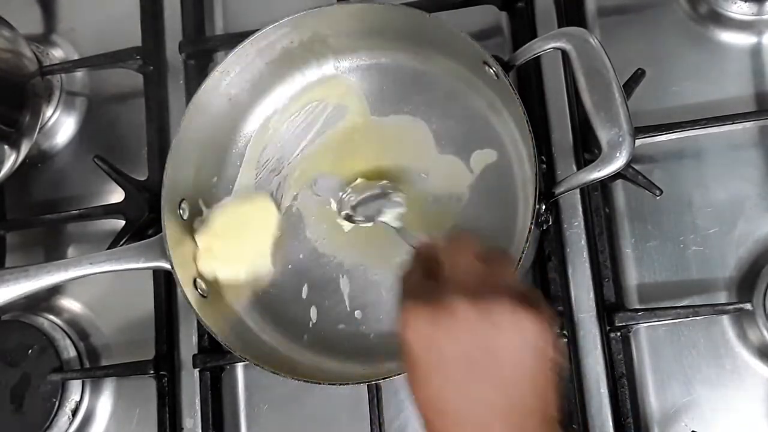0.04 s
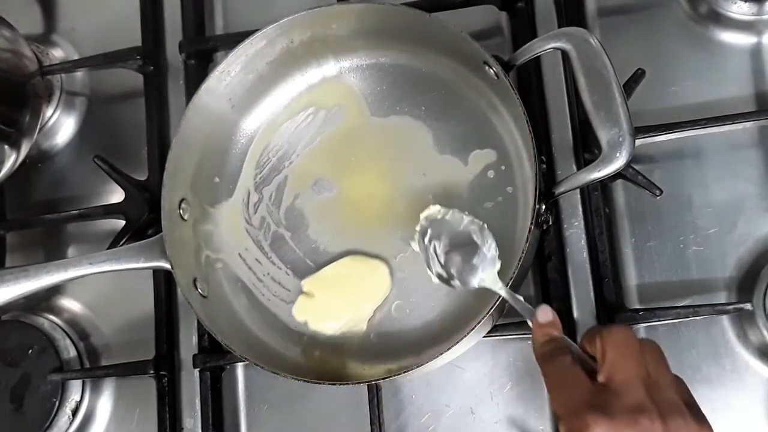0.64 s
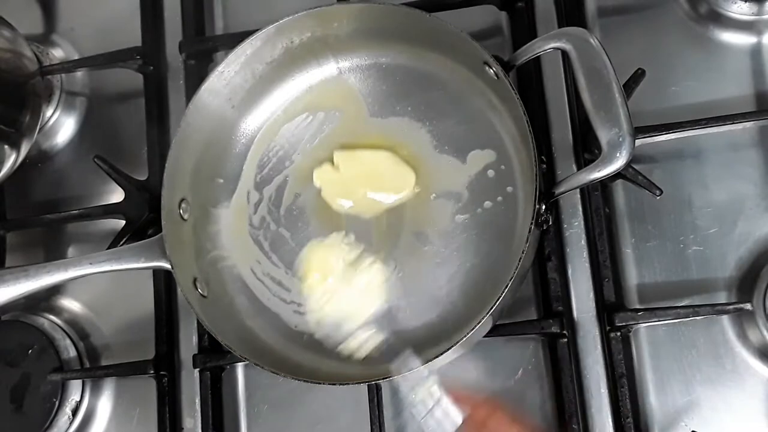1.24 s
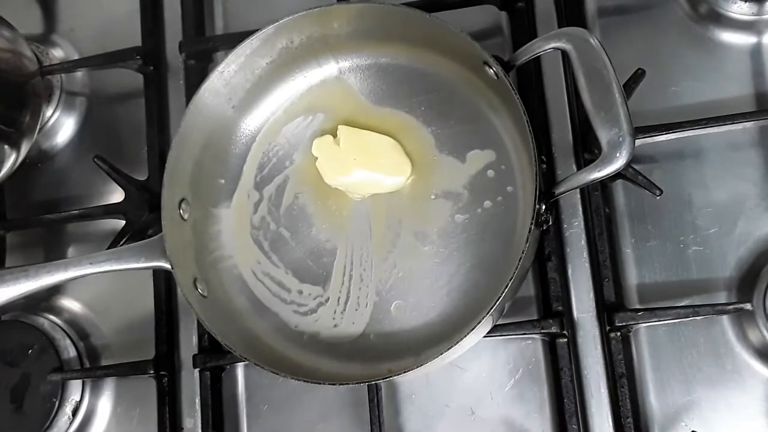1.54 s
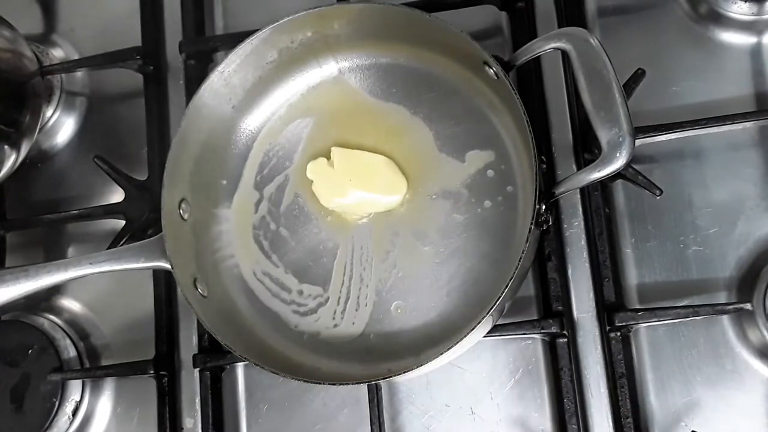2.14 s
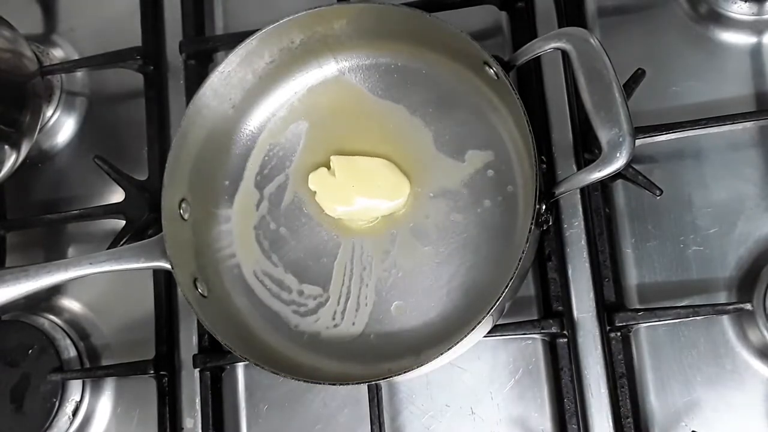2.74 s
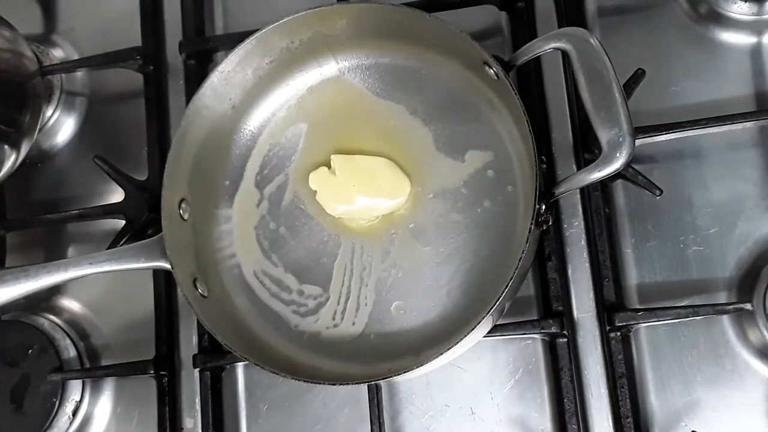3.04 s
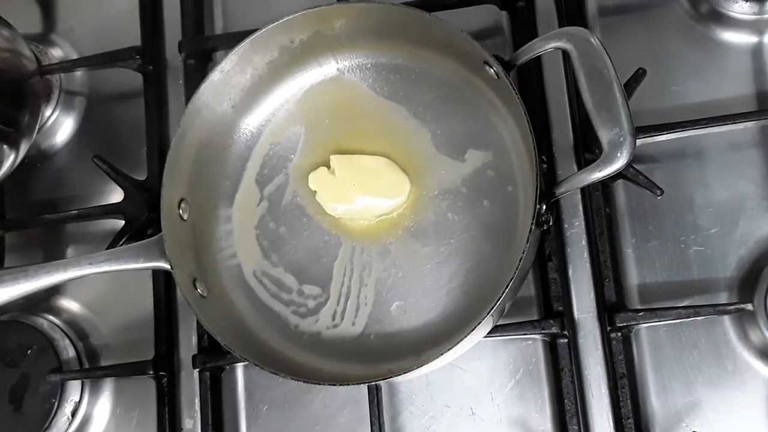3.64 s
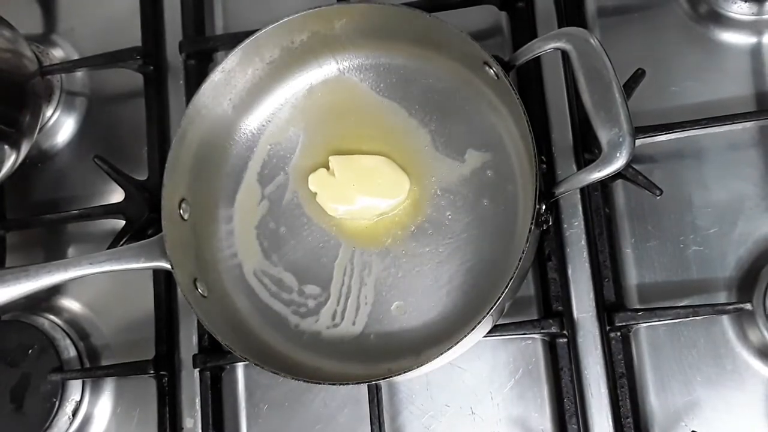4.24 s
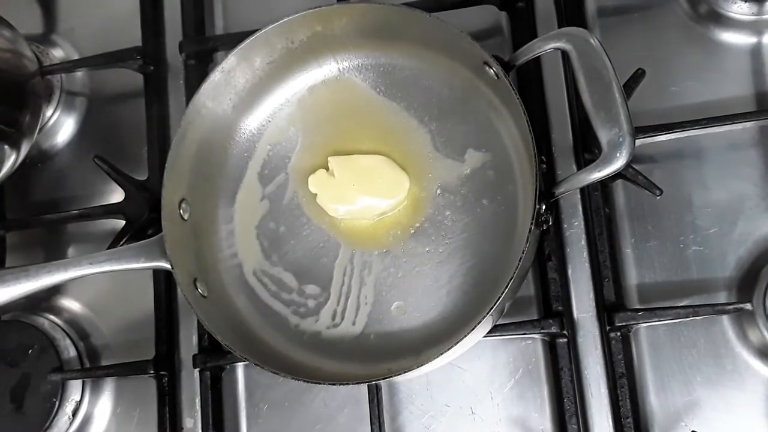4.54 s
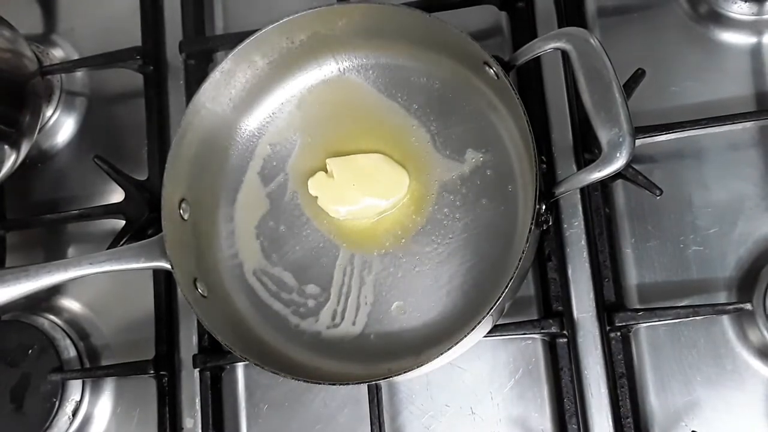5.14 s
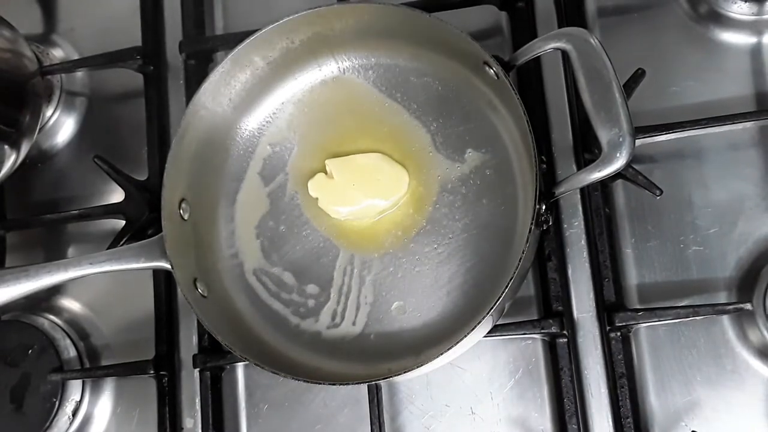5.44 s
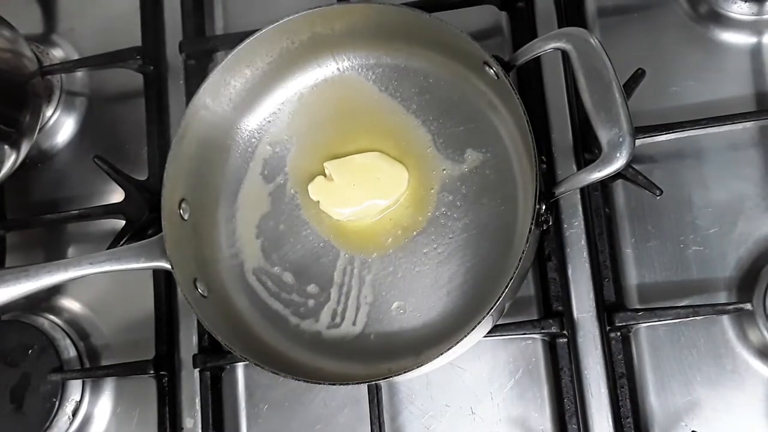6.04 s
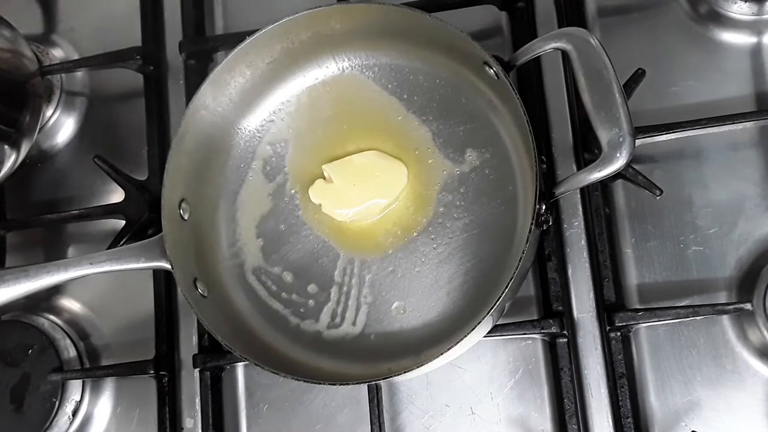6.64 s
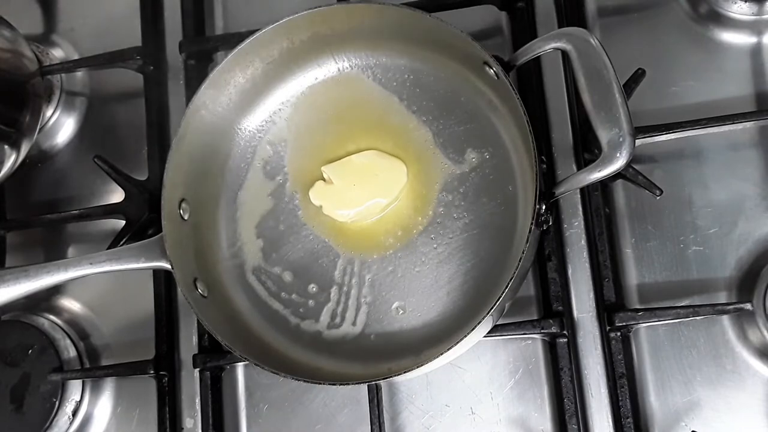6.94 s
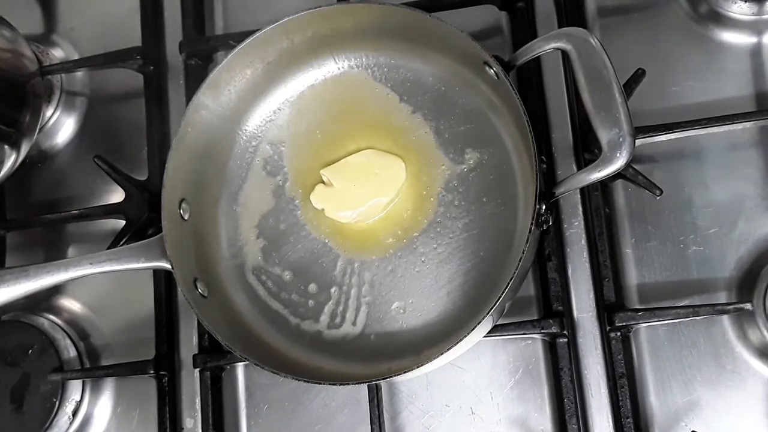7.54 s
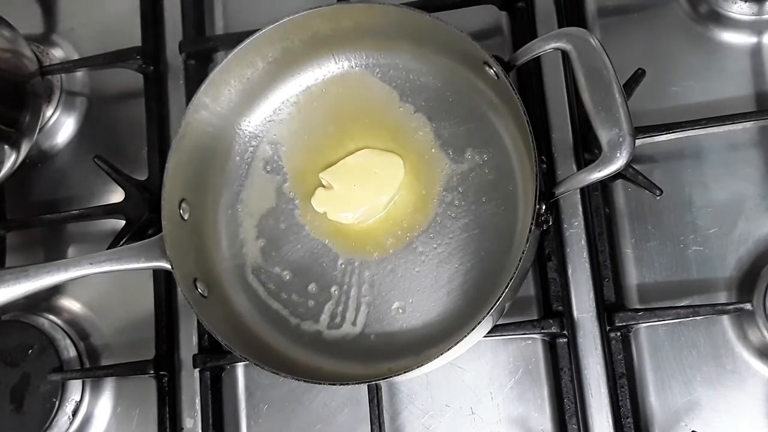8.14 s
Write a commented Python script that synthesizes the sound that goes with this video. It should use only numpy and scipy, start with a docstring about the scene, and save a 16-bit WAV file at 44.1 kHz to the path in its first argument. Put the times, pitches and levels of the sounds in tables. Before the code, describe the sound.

A spoon pushes butter around a metal frying pan, then the butter keeps sizzling, with occasional spits and light knocks.

```python
"""A bright, steady sizzle: a knob of butter in a hot steel frying pan, heard from just above the stove.
Its water bursts out in thousands of tiny steam pops that ring the pan and blur in the kitchen.
A spoon first pushes the butter around; fat spits, the pan knocks, and two pairs of squeaks sound.
Faint bumps, rustles, a rumble and a mains hum lie underneath."""
import sys
import numpy as np
from scipy import signal
from scipy.fft import rfft, irfft, next_fast_len
from scipy.io import wavfile
from scipy.ndimage import uniform_filter1d

SR = 44100
rng = np.random.default_rng(int(sys.argv[2]) if len(sys.argv) > 2 else 0)


def inscribe(sig):
    """Save sig as 16-bit PCM at rate SR to the path in sys.argv[1].

    A 1-D sig is mono; a 2-D sig holds one channel per row.
    Samples are clipped to [-1, 1] before scaling.
    """
    pcm = np.round(np.clip(np.atleast_2d(sig).T, -1, 1) * 32767)
    wavfile.write(sys.argv[1], SR, pcm.astype(np.int16))


N = 365677
TIME = np.arange(N) / SR

# how hard the butter boils: (time [s], level [dB])
BOIL = [(0, -17), (.14, -23), (.57, -24), (.6, -21), (.85, -19), (1.13, -19.5), (1.43, -17), (1.8, -17),
        (2.55, -17), (3.03, -19.5), (3.38, -18.5), (3.7, -16.5), (5, -16.5), (5.6, -16), (6.4, -18.5),
        (6.58, -16.3), (6.75, -17.5), (7.28, -17), (7.65, -16.5), (8.29, -16)]
# spoon pushes smearing the butter: (start [s], length [s], crackle [dB], pan ring [dB])
STROKES = [(0, .025, -32, -37), (.1, 0.053, -47, -46), (.7, 0.027, -34.5, -57), (.875, 0.014, -33.5, -44),
           (.97, 0.12, -35, -38), (1.2, 0.056, -41, -43.5), (1.31, 0.048, -34, -40), (1.41, .02, -39, -43),
           (1.49, 0.041, -34.5, -42)]
STROKE_ATTACK_S, STROKE_RELEASE_S = 0.024, 0.052


def undb(db):
    """Decibels to gain."""
    return 10 ** (np.asarray(db) / 20)


def unit(x):
    """Scale to rms 1."""
    return x / np.sqrt(np.mean(x ** 2))


def follow(rows):
    """Gain along a (time [s], level [dB]) curve; fades outside its span."""
    times_s, db = np.transpose(rows)
    outside_s = np.maximum(times_s[0] - TIME, 0) + np.maximum(TIME - times_s[-1], 0)
    return undb(np.interp(TIME, times_s, db)) * np.exp(-10 * outside_s)


def swell(start_s, length_s, attack_s, release_s):
    """Envelope: rises to 1 at its start, holds, dies away."""
    before_s, after_s = np.maximum(start_s - TIME, 0), np.maximum(TIME - start_s - length_s, 0)
    return np.exp(-before_s / attack_s - after_s / release_s)


def swells(rows, attack_s, release_s, column=2):
    """Power sum of (start [s], length [s], levels [dB]...) envelopes; column picks the level."""
    gains = (undb(row[column]) * swell(row[0], row[1], attack_s, release_s) for row in rows)
    return np.sqrt(sum(gain ** 2 for gain in gains))


def walk(rate_hz):
    """Smooth random wander; rms 1."""
    held = rng.standard_normal(N)[(TIME * rate_hz).astype(int)]
    return unit(uniform_filter1d(held, max(int(SR / rate_hz), 1)))


def pops(per_s, spread_db):
    """Impulses of random time and size; rms 1."""
    at = np.flatnonzero(rng.random(N) < per_s / SR)
    size, sign = np.minimum(rng.standard_normal(N)[at], 2), (-1) ** at
    return unit(np.bincount(at, sign * undb(spread_db * size), N))


def blows(rows):
    """One impulse per (time [s], level [dB]) row."""
    times_s, db = np.transpose(rows)
    return np.bincount((times_s * SR).astype(int), undb(db), N)[:N]


def through(x, response):
    """Convolve with an impulse response."""
    return signal.fftconvolve(x, response)[:len(x)]


def colour(points, size=4096):
    """Minimum-phase click with a (frequency [Hz], level [dB]) spectrum; peak 1."""
    hz, db = np.transpose(points)
    log_hz = np.log(np.fft.rfftfreq(size, 1 / SR) + 1)
    log_gain = np.interp(log_hz, np.log(hz), np.log(undb(db)))
    cepstrum = irfft(log_gain)[:size // 2]
    cepstrum[1:] *= 2
    click = irfft(np.exp(rfft(cepstrum, size)))
    return click / np.abs(click).max()


def resonate(x, hz, width_hz):
    """One damped resonance, gain 1 at its centre."""
    return signal.lfilter(*signal.iirpeak(hz, hz / width_hz, fs=SR), x + np.finfo(float).eps)


def room(x, t60_s, wet_db):
    """Hard kitchen walls add a diffuse tail."""
    t = TIME[:SR // 2]
    tail = rng.standard_normal(len(t)) * undb(-60 * t / t60_s) * (t > .004)
    return x + undb(wet_db) * through(x, tail / np.linalg.norm(tail))


def scatter(hits, t60_s, wet_db):
    """Each impulse comes from its own spot, so gets its own diffuse tail from the walls."""
    decay = np.exp(-2 * np.log(1000) / (t60_s * SR))
    energy = signal.lfilter([1 - decay], [1, -decay], hits ** 2 + np.finfo(float).eps ** 2)
    return hits + undb(wet_db) * np.sqrt(energy) * rng.standard_normal(N)


def hob_echo(x, lag_s, gain, cutoff_hz):
    """Nearby steel throws back a duller copy, which combs the hiss."""
    hz = np.fft.rfftfreq(next_fast_len(N + SR // 10), 1 / SR)
    echo = gain / (1 + (hz / cutoff_hz) ** 4) * np.exp(-2j * np.pi * hz * lag_s)
    size = 2 * (len(hz) - 1)
    return irfft(rfft(x, size) * (1 + echo), size)[:N]


def pan(x, cutoff_hz):
    """Pan modes driven through soft butter, which dulls each contact."""
    # steel pan modes: (frequency [Hz], width [Hz], level [dB])
    modes = [(740, 16, -8.5), (766, 27, -0.5), (1017, 140, -7), (1202, 39, 1.5), (1210, 110, -31),
             (1750, 98, -5)]
    push = signal.sosfilt(signal.butter(2, cutoff_hz, fs=SR, output="sos"), x + np.finfo(float).eps)
    # narrow modes hold their energy longer
    return sum(undb(db) * np.sqrt(SR / width_hz) * resonate(push, hz, width_hz)
               for hz, width_hz, db in modes)


def ringing(resonances, per_s, spread_db, wet_db):
    """Each resonance is pinged by its own stream of pops; rms 1."""
    out = 0
    for hz, width_hz, db in resonances:
        stream = scatter(pops(per_s, spread_db), t60_s=0.074, wet_db=wet_db)
        out = out + undb(db) * unit(resonate(stream, hz, width_hz))
    return unit(out)


def chirps(rows, t60_s, rise, size=2048):
    """Bubbles (time [s], level [dB], pitch [Hz]) ring briefly and glide up as they surface."""
    t, out = TIME[:size], np.zeros(N + size)
    envelope = undb(-60 * t / t60_s) * (1 - np.exp(-t / .0004))
    for start_s, db, hz in rows:
        start = int(np.clip(start_s * SR, 0, N - 1))
        phase = 2 * np.pi * hz * t * (1 + rise * t / t60_s)
        out[start:start + size] += undb(db) * envelope * np.sin(phase)
    return out[:N]


def background(hum_hz=100.3, hum_db=-56.5):
    """Low kitchen rumble and a wavering mains hum, both fainter at first."""
    # kitchen rumble spectrum: (frequency [Hz], level [dB])
    spectrum = [(20, -40), (48, -19), (75, 0), (135, 2.5), (185, 1), (220, -11), (290, -1), (450, -2.5),
                (800, -14), (3000, -17.5)]
    rumble = unit(through(rng.standard_normal(N), colour(spectrum)))
    rumble *= undb(-52.5 + 1.3 * walk(rate_hz=3.7))
    hum = np.sqrt(2) * np.sin(2 * np.pi * hum_hz * TIME) * undb(hum_db + 1.5 * walk(rate_hz=5))
    return (rumble + hum) * undb(np.interp(TIME, [.5, .7], [-5, 0]))


def rustles(attack_s=0.067, release_s=0.052):
    """Soft friction: dull rubs close by, lighter brushes against the stove."""
    # friction spectra: (frequency [Hz], level [dB])
    rub_spectrum = [(30, -28), (70, 1), (120, -1.5), (200, -8.5), (290, -2), (550, -16.5), (1700, -10.5),
                    (4000, -40)]
    brush_spectrum = [(150, -20), (330, -1), (550, 1), (900, -15), (2000, -10), (4000, -36)]
    # contacts: (start [s], length [s], level [dB])
    rubs = [(3.7, 0.077, -44), (3.86, 0.2, -43.5), (7.0, .01, -47)]
    brushes = [(5.73, 0.032, -48.5), (5.85, .02, -51)]
    rub = unit(through(pops(per_s=410, spread_db=-1.5), colour(rub_spectrum)))
    brush = unit(through(pops(per_s=1100, spread_db=3), colour(brush_spectrum)))
    return rub * swells(rubs, attack_s, release_s) + brush * swells(brushes, attack_s, release_s)


def bumps():
    """Dull bumps on the stove."""
    # impacts: (time [s], level [dB])
    hits = [(.606, -29.5), (.835, -38), (1.297, -44), (5.838, -42)]
    # thud spectrum: (frequency [Hz], level [dB])
    thud = [(45, -41), (100, -15), (150, 0), (190, 9.5), (240, -18), (370, -1), (550, -17), (1500, -31.5)]
    return through(scatter(blows(hits), t60_s=0.26, wet_db=7), colour(thud)) * undb(0.5)


def knocks():
    """The spoon, or steam escaping under the butter, rings the pan in short flurries of contacts."""
    # blows on the pan: (time [s], level [dB])
    hits = [(0.596, -18), (1.31, -24), (1.556, -22), (2.028, -21.5), (2.807, -27), (3.175, -25),
            (4.337, -27.5), (6.67, -31.5), (6.74, -26.5), (7.837, -30)]
    return pan(scatter(blows(hits), t60_s=0.2, wet_db=-3.5), cutoff_hz=990) * undb(5.5)


def spits():
    """Fat spits: a spray plus one bubble's ring."""
    # spits: (time [s], level [dB], bubble pitch [Hz])
    bursts = [(0.4952, -25, 3220), (0.884, -23, 3190), (1.41, -20, 3190), (1.6637, -25.5, 3270),
              (1.812, -19, 4250), (1.8205, -17, 4800), (1.838, -21, 4250), (1.9066, -18, 4900),
              (2.0867, -18, 4770), (2.096, -20, 4300), (3.4655, -22, 4800), (3.915, -22, 3970),
              (5.127, -21, 4900), (7.487, -22, 5000), (7.898, -18, 4940)]
    # spray spectrum: (frequency [Hz], level [dB])
    spectrum = [(1200, -44), (2800, 1), (4200, 14), (5500, -5), (8000, -8), (15000, -23)]
    hits = blows(np.array(bursts)[:, :2])
    spray = through(scatter(hits, t60_s=.19, wet_db=6.5), colour(spectrum))
    bubbles = room(chirps(bursts, t60_s=0.05, rise=0.016), t60_s=.2, wet_db=-7)
    return (spray + bubbles) * undb(-3)


def squeaks():
    """Thin, wavering whistles: sliding butter, later probably steam squeezing out under it."""
    # whistles: (start [s], length [s], level [dB], pitch [Hz], glide [Hz/s])
    whistles = [(0.286, 0.022, -49, 2540, -900), (0.392, 0.038, -49, 2460, -900),
                (3.53, 0.12, -36.5, 3045, 300), (3.67, .05, -43.5, 3005, 300)]
    out = 0
    for start_s, length_s, db, hz, hz_per_s in whistles:
        pitch_hz = hz + hz_per_s * np.clip(TIME - start_s, 0, length_s) + 48 * walk(rate_hz=130)
        tone = np.sqrt(2) * np.sin(2 * np.pi * np.cumsum(pitch_hz) / SR)
        tone *= undb(2.5 * walk(rate_hz=70) - 1)
        out = out + tone * undb(db) * swell(start_s, length_s, attack_s=.007, release_s=.005)
    return room(out, t60_s=0.71, wet_db=-4.5)


def sliding(column):
    """Gain from the butter's motion: spoon pushes on top of a slowing glide."""
    # butter gliding on its melt, then settling: (start [s], length [s], crackle [dB], pan ring [dB])
    glides = [(.85, .45, -42.5, -44.5), (1.95, 0.36, -39, -47.5)]
    pushes = swells(STROKES, STROKE_ATTACK_S, STROKE_RELEASE_S, column)
    return np.hypot(swells(glides, attack_s=0.37, release_s=1, column=column), pushes)


def stirring():
    """Fresh butter crackles where smeared; the sliding spoon makes the pan ring and sing."""
    # smeared butter spectrum: (frequency [Hz], level [dB])
    smear = [(500, -19), (1400, -13.5), (2000, -3.5), (2600, -0.5), (3300, -1), (4200, -2), (5200, -7),
             (9000, -31)]
    # resonances of the greasy steel: (frequency [Hz], width [Hz], level [dB])
    sing_modes = [(2520, 150, -10), (3193, 180, 5), (3390, 55, -4), (4070, 200, -2), (4570, 140, -4.5)]
    # singing under the spoon: (time [s], level [dB])
    sing_levels = [(0, -44), (.36, -40.5), (.54, -35.5), (.85, -43), (1.2, -38), (1.85, -43), (2.1, -41)]
    crackle = scatter(pops(per_s=1500, spread_db=5.5), t60_s=0.21, wet_db=-3)
    crackle = hob_echo(through(crackle, colour(smear)), lag_s=0.00117, gain=0.15, cutoff_hz=6500)
    crackle = unit(crackle) * sliding(column=2)
    scrape = unit(pan(pops(per_s=1500, spread_db=0), cutoff_hz=2410)) * sliding(column=3)
    sing = ringing(sing_modes, per_s=1600, spread_db=2.5, wet_db=-13) * follow(sing_levels)
    return room(crackle + scrape + sing, t60_s=0.1, wet_db=-10)


def froth(surge, melt_s=1.18, growth_db_per_s=0.19):
    """Larger bubbles: they come in as the butter melts and spreads, and when the spoon squeezes it."""
    # resonances of fat and pan: (frequency [Hz], width [Hz], level [dB])
    modes = [(736, 68, -20), (950, 147, -18.5), (1220, 67, -19.5), (1749, 70, -22.5), (2285, 340, -18.5),
             (2650, 220, -15.5), (3260, 110, -16), (3435, 105, -13.5), (4036, 110, -9.5), (4273, 70, -10.5),
             (4863, 106, -5), (5080, 220, -6), (5605, 140, -2.5), (5770, 170, -2), (6520, 390, 3)]
    melted = follow(BOIL) * undb(-10.5 - 7.5 * np.exp(-TIME / melt_s) + growth_db_per_s * TIME)
    squeezed = swells(STROKES, STROKE_ATTACK_S, STROKE_RELEASE_S) * undb(-1)
    bubbles = ringing(modes, per_s=500, spread_db=4.5, wet_db=-3)
    return bubbles * undb(0.3 * surge) * np.hypot(melted, squeezed)


def pings(centre_hz, log_spread, spread_db, count=1400):
    """Pitched bubbles of random size, fainter away from the centre pitch; rms 1."""
    times_s = rng.random(count) * N / SR
    detune, strength = np.clip(rng.standard_normal((count, 2)), -2, 2).T
    db = spread_db * strength - 4 * detune ** 2
    hz = centre_hz * np.exp(log_spread * detune)
    return unit(chirps(zip(times_s, db, hz), t60_s=0.04, rise=0.015))


def fizz(surge):
    """Tiny steam bubbles burst into a hiss dotted with pings."""
    # fizz spectrum: (frequency [Hz], level [dB])
    spectrum = [(600, -46.5), (2500, -40.5), (5200, -36), (6300, -17.5), (7200, -7.5), (7700, -5),
                (8150, -0.5), (8700, -4.5), (9500, -12), (10300, -16.5), (12500, -22), (15500, -25)]
    bursts = scatter(pops(per_s=12000, spread_db=4), t60_s=0.11, wet_db=-8.5)
    bursts *= undb(0.21 * surge + 0.44 * walk(rate_hz=90))
    hiss = unit(through(bursts, colour(spectrum)))
    hiss += undb(-9.5) * pings(centre_hz=7945, log_spread=0.0845, spread_db=0.5)
    return unit(hob_echo(hiss, lag_s=.001231, gain=0.28, cutoff_hz=7900)) * follow(BOIL)


def sizzle():
    """Water boils out of the butter; fizz and froth share the same little surges."""
    surge = walk(rate_hz=14)
    return room(fizz(surge) + froth(surge), t60_s=0.13, wet_db=-14.5)


def scene():
    """All sources, the same in both ears."""
    mono = squeaks() + sizzle() + stirring() + spits() + knocks() + bumps() + rustles() + background()
    return np.array([mono, mono])


def record(dry):
    """Steep low-pass on the top treble."""
    cutoff_hz = 15680
    return signal.sosfilt(signal.ellip(12, .1, 90, cutoff_hz, fs=SR, output="sos"), dry)


dry = scene()
out = record(dry)
inscribe(out)
```